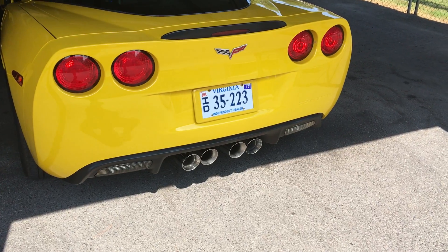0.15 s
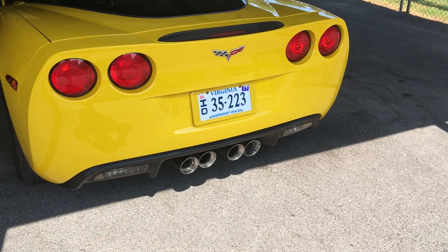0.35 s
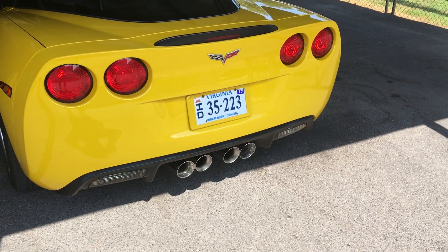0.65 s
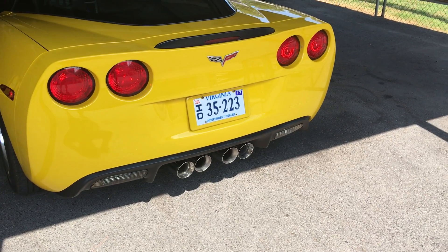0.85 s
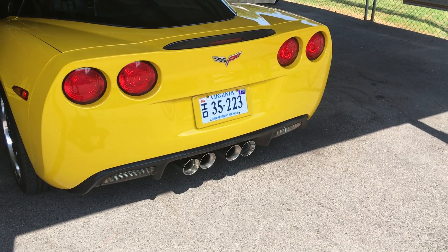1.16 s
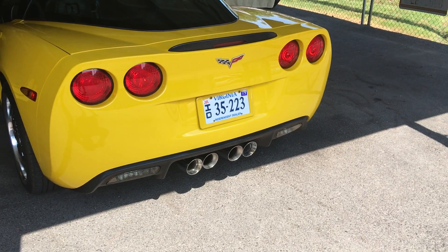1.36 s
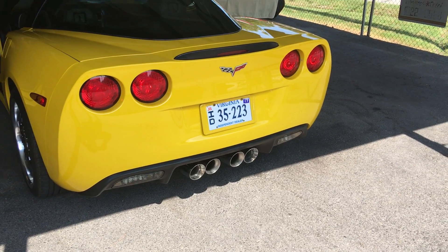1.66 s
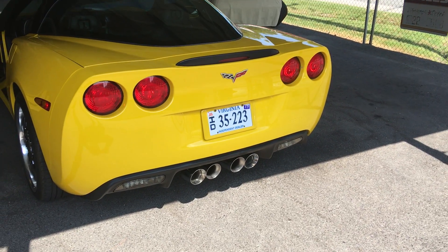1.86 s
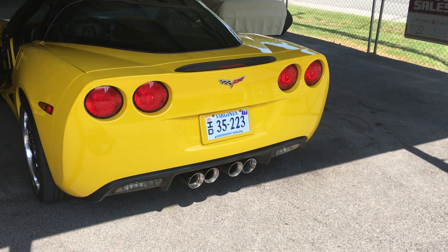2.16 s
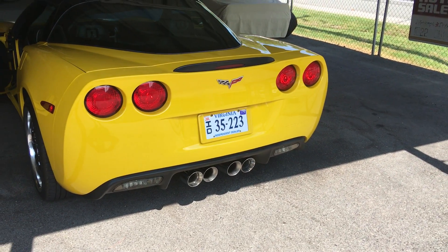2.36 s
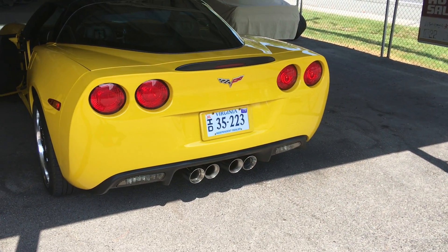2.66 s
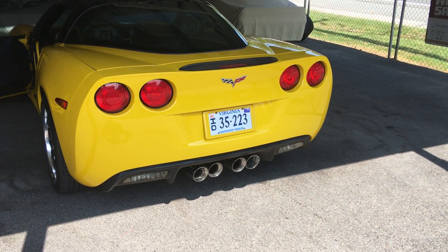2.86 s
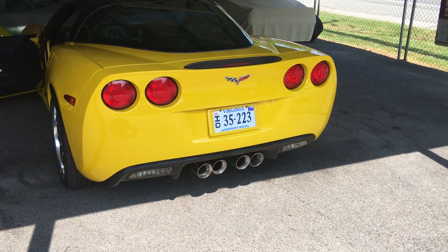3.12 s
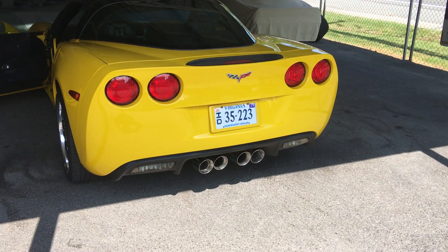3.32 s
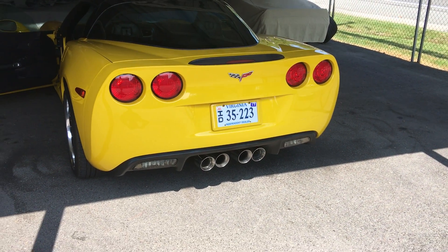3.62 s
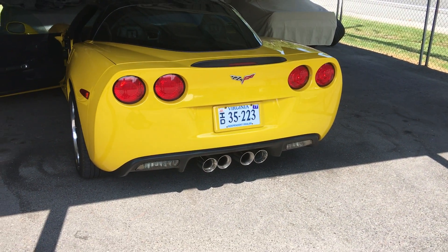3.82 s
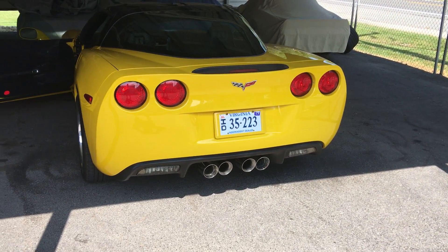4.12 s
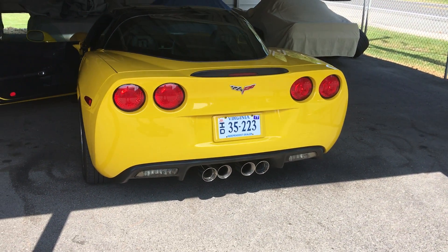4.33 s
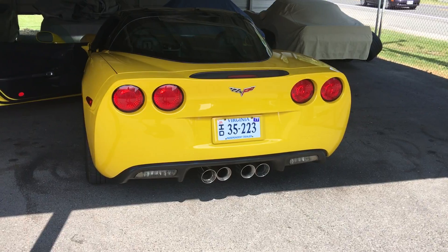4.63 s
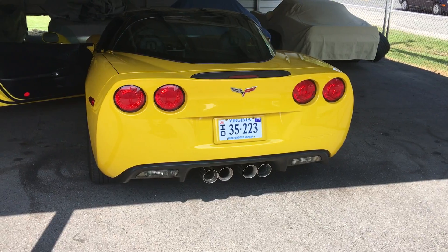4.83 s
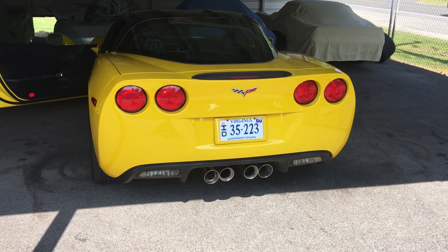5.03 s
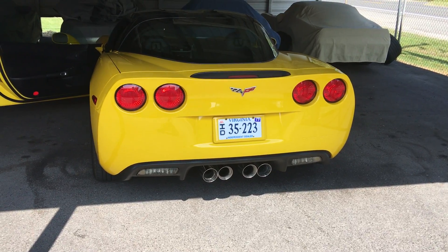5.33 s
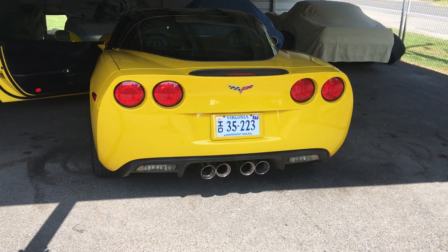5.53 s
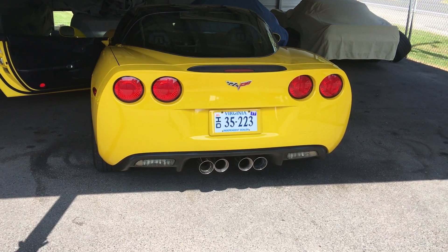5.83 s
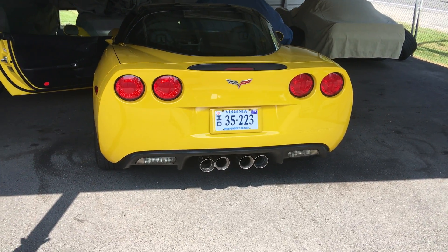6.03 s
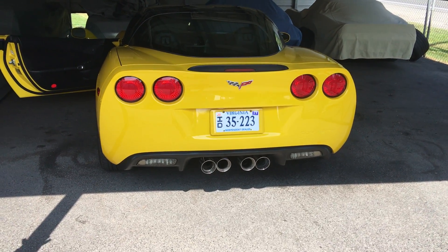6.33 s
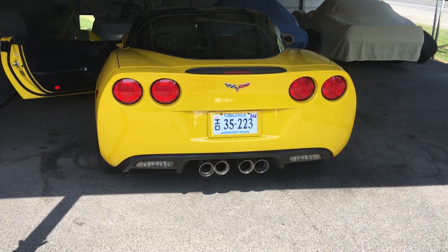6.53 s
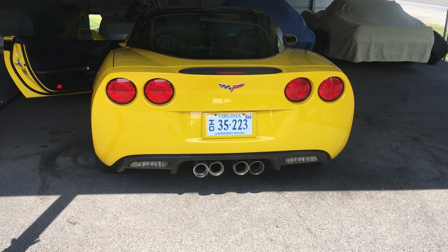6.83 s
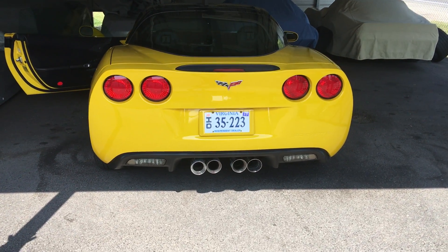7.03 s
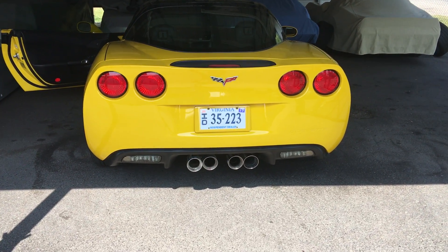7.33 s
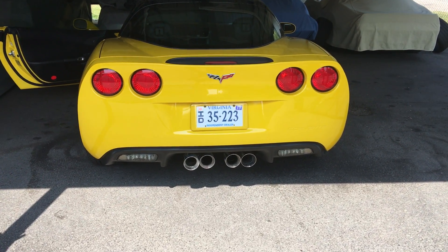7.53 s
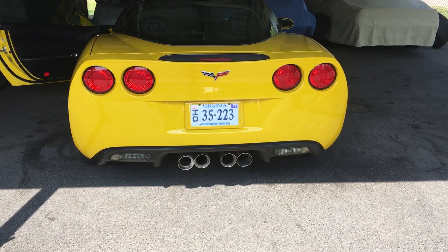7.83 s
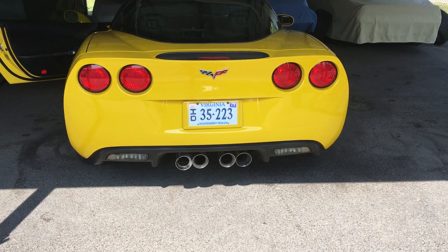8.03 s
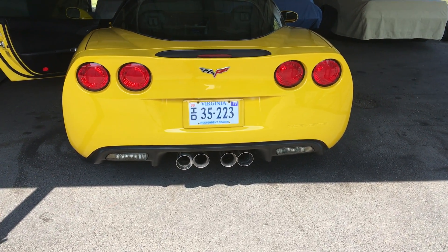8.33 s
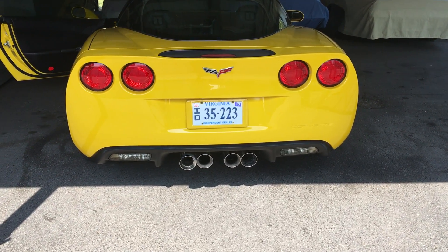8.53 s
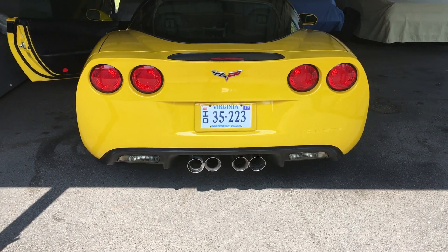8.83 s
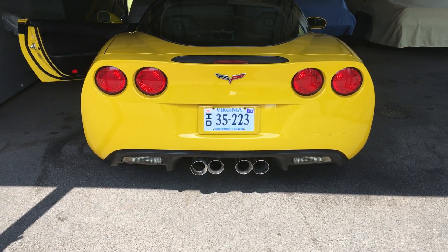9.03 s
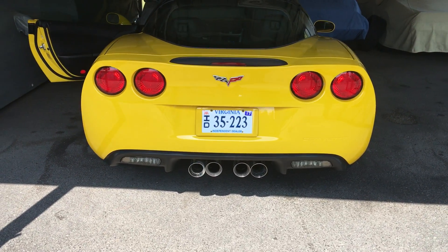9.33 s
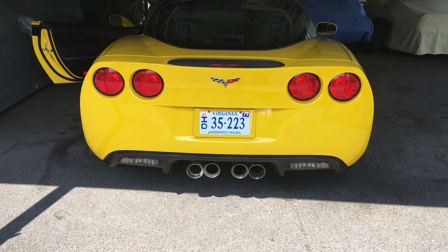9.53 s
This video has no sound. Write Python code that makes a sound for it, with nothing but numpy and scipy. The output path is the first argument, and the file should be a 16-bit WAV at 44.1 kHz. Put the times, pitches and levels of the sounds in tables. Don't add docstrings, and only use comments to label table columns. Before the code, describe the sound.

A big V8 idles roughly from start to finish, already running. Heavy low thumps roll in an uneven lope of strong firings and near misses, with rasp, short metallic ringing and hissing gas from the exhaust tips. The handheld microphone, a few steps away, moves from beside the car to directly behind, so the bark grows louder and crisper. Short open carport reflections and faint passing cars surround it.

```python
import sys
import numpy as np
from scipy import signal
from scipy.fft import rfft, irfft
from scipy.io import wavfile
from scipy.ndimage import uniform_filter1d

SR = 44100
rng = np.random.default_rng(int(sys.argv[2]) if len(sys.argv) > 2 else 0)


def log_audio(samples):
    frames = np.atleast_2d(samples).T
    limited = np.clip(frames, -1, 1)
    pcm = np.round(limited * 32767).astype(np.int16)
    wavfile.write(sys.argv[1], SR, pcm)


def linear_from_db(decibels):
    return 10 ** (np.asarray(decibels, float) / 20)


N = 426447

FIRE_HZ = 57.9
# (time [s], share of the way round [0-1])
WALK = [
    (0, 0),
    (1.3, 0.19),
    (3, 0.35),
    (5, 0.69),
    (7, 0.81),
    (8, 0.78),
    (9.67, 1),
]


def evened(x):
    return x / np.sqrt(np.mean(x ** 2) + 1e-20)


def curve(rows, t):
    return np.interp(t, *np.transpose(rows))


def coloured(x, points):
    f, level_db = np.transpose(points)
    hz = np.fft.rfftfreq(len(x), 1 / SR)
    gain = linear_from_db(np.interp(np.log(hz + 1), np.log(f), level_db))
    return irfft(rfft(x) * gain, len(x))


def train(s, size):
    sample = np.clip(np.round(s * SR).astype(int), 0, N - 1)
    return np.bincount(sample, size * (s < N / SR), N)


def puffs(s, size, rise_ms, fall_ms):
    ms = np.arange(4096) * 1000 / SR
    puff = (1 - np.exp(-ms / rise_ms)) ** 2 * np.exp(-ms / fall_ms)
    return signal.oaconvolve(train(s, size), puff)[:N]


def yard():
    # (closest time [s], half-length [s], level [dB])
    passing = [
        (0.09, 0.19, 1),
        (2.69, 1, 7.5),
        (5.6, 1.0, 7),
        (9.9, 0.49, 11.5),
    ]
    # (frequency [Hz], density [dB per Hz])
    yard_colour = [(260, -20), (450, -10.5), (530, -6.5), (905, 1), (1350, -10), (2280, -18.5), (2680, -22),
                   (5010, -28), (9350, -34), (15700, -73)]
    t = np.arange(N) / SR
    swell_db = sum(db / (1 + ((t - s) / half_s) ** 2) for s, half_s, db in passing)
    noise = evened(coloured(rng.standard_normal(N), yard_colour))
    return linear_from_db(-45 + swell_db - swell_db.mean()) * noise


def carport(x):
    at = np.arange(300, 12000, 20)
    sign = rng.choice([-1., 1.], len(at))
    arrival_s = (at + rng.integers(0, 20, len(at))) / SR
    taps = train(arrival_s, sign * linear_from_db(-60 * at / SR / .25))[:12100]
    return signal.oaconvolve(x, taps / np.linalg.norm(taps))[:N]


def burns(s):
    # (swap time [s], time it takes [s])
    swaps = [
        (6.4, 1.0),
        (3.4, .7),
        (10.3, 2.4),
        (2.1, .3),
        (1.93, .1),
        (7.6, .1),
        (1.72, .2),
        (-2., .3),
    ]
    first_turn = [1, 1, 1, 1, 1, 0, 1, 1]
    overlap = 0.18
    k = np.arange(len(s))
    swap_s, takes_s = np.array(swaps)[k % 8].T
    first = k // 8 % 2 == np.take(first_turn, k % 8)
    toward = np.where(first, -1, 1) * (s - swap_s) / takes_s
    return np.clip(.5 + overlap + toward, 0, 1), first


def firings():
    # (time [s], crank lead [firings])
    crank = [(0.0, -0.06), (0.14, 0.38), (0.83, 0.63), (1.11, 0.6), (1.52, 0.83), (1.66, 1.11),
             (2.07, 0.94), (2.21, 0.73), (2.76, 1.72), (3.87, 1.4), (4.14, 1.82), (4.7, 2.03), (5.11, 1.81),
             (6.08, 2.63), (6.35, 2.22), (7.74, 2.27), (8.84, 1.48), (9.67, 1.68)]
    flywheel = .033

    def levelled(v):
        trend = uniform_filter1d(v, size=16, mode="nearest")
        return v - uniform_filter1d(trend, size=16, mode="nearest")

    t = np.arange(0, N, 64) / SR
    turns = t * FIRE_HZ + curve(crank, t)
    k = np.arange(int(turns[-1]))
    push = levelled(burns(np.interp(k, turns, t))[0])
    speed = levelled(np.cumsum(push))
    lead = flywheel * levelled(np.cumsum(speed))
    return np.interp(k - lead, turns, t)


def pattern(s):
    # (bark before swap [dB], bark after [dB], crack [dB],
    #             upper pipe modes on a burn [dB], the same on a miss [dB])
    cylinders = [(-2.5, -0.5, 3, 0.5, 0), (-2, -0.5, 1.5, 0.5, 3), (0, -1, 1, 2, 1),
                 (-2, -0.5, 4, -1, -4.5), (-1, -0.5, 3, -3, 5), (-2, -1, 5, -2.5, -3),
                 (-0.5, 0, 2.5, 3, -6), (-2, -0.5, 4.5, 1.5, -5)]
    miss_db, spill_db = -13.5, -13
    plain_crack_db, missed_crack_db = -9, -49.5
    after_miss_db, crack_round_db = 2, 9
    (burn, first), share = burns(s), curve(WALK, s)
    before_db, after_db, edge_db, burnt_db, missed_db = np.array(cylinders)[np.arange(len(s)) % 8].T
    own_db = miss_db + burn * (np.where(first, before_db, after_db) - miss_db)
    level_db = np.maximum(own_db, np.roll(own_db, 1) + spill_db)
    rested = 1 - np.roll(burn, 1)
    burnt_crack_db = edge_db + rested * (after_miss_db + crack_round_db * share)
    crack_db = plain_crack_db + burn * burnt_crack_db + (1 - burn) * missed_crack_db * (.5 + rested / 2)
    upper_db = missed_db + burn * (burnt_db - missed_db) + 2.5 * share
    return level_db, crack_db, upper_db, burn * rested * share


def hiss(s, fired_db, edge_db):
    # (frequency [Hz], density [dB per Hz])
    jet = [(1410, -24), (2400, -4.5), (2560, -7), (2830, -17), (3560, -8.5), (4200, -11.5), (4990, -11),
           (5930, -10), (9510, -11), (10400, -10), (11100, -12), (14100, -15.5), (15700, -17.5)]
    crack_db = np.minimum(2.2 * edge_db, 8) + 1.7 * rng.standard_normal(len(s))
    crack = puffs(s + .0062, linear_from_db(crack_db), .6, 2.5)
    flow = puffs(s + .005, linear_from_db(.7 * fired_db), 4.0, 17.)
    gas = (0.69 * evened(crack) + evened(flow)) * rng.standard_normal(N)
    return linear_from_db(-54.5) * evened(coloured(gas, jet))


def bark(s, size):
    # (frequency [Hz], density [dB per Hz])
    beside = [(260, -36), (450, 1.5), (480, -40), (549, -55), (669, 1), (766, 0), (912, 7.5), (1450, -10),
              (1670, -22), (1750, -9.5), (2020, -10), (2360, -16), (2540, -32), (3000, -48), (3900, -56.5),
              (6600, -120)]
    midway = [(260, -54), (450, -4.5), (507, -15), (589, -5), (685, -18.5), (742, 0.5), (949, -4),
              (1090, -5.5), (1360, -11.5), (1480, -7.5), (1630, -2.5), (1820, -21.5), (2400, -32),
              (3000, -30), (3900, -54), (6600, -120)]
    facing = [(260, -29), (450, -2), (523, -50), (571, -16), (613, -7.5), (736, -4.5), (797, -1.5),
              (927, 4.5), (1080, 6), (1390, -10), (1670, -19.5), (1970, -22), (2180, -39), (3000, -71),
              (3900, -81), (6600, -120)]
    envelope = puffs(s + .0008, size, 2.2, 5.5) + .25 * puffs(s, size, 3.0, 20.)
    rasp = envelope * rng.standard_normal(N)
    share = np.clip(curve(WALK, np.arange(N) / SR), 0, 1)
    blend = np.zeros(N)
    for at, colour, db in zip((0, .5, 1), (beside, midway, facing), (2.5, 1.5, .3)):
        weight = np.clip(1 - 2 * abs(share - at), 0, 1)
        blend += weight * linear_from_db(db) * coloured(rasp, colour)
    return linear_from_db(-38.) * evened(blend)


def tips(s, size, rested):
    # (beside [Hz], facing [Hz], beside [dB], facing [dB], delay [ms])
    tip_rings = [(925, 993, -32, -25, 0.72), (1524, 1633, -47, -39.5, 3.016), (2064, 2295, -34, -47, 2.545)]
    rested_gain = [2, 2.5, -0.5]
    pitch_spread, spread_db, rise_ms, fall_ms = .06, 1.5, 1.7, 3.6
    n, share = np.arange(700), np.clip(curve(WALK, s), 0, 1)
    ms = n * 1000 / SR
    shape = (1 - np.exp(-ms / rise_ms)) ** 2 * np.exp(-ms / fall_ms)
    luck, out = rng.standard_normal((len(s), len(tip_rings), 3)), np.zeros(N)
    for (hz0, hz1, db0, db1, delay_ms), rested_db, (a, b, c) in zip(tip_rings, rested_gain, luck.transpose(1, 2, 0)):
        hz = (hz0 + share * (hz1 - hz0)) * (1 + pitch_spread * a)
        gain = size * linear_from_db(db0 + share * (db1 - db0) + spread_db * b + rested_db * rested + 11.0)
        wave = np.sin(2 * np.pi * hz[:, None] * n / SR + 3 * c[:, None])
        at = s[:, None] + delay_ms / 1000 + n / SR
        out += train(at.ravel(), (gain[:, None] * shape * wave).ravel())
    return out


def thump(s, fired_db, upper_db):
    # (frequency [Hz], width [Hz], level [dB], crest after arrival [ms], share of a miss's drop [0-1])
    modes = [(64.4, 69, -1, 12.7, 0.87), (76.6, 10.8, 6, 10.83, 0.5), (106.2, 20.6, 2.5, 13.31, 0.65),
             (120, 21, -10.5, 12.8, 0.89), (185.3, 10.7, -10.5, 12.16, 0.31), (242.9, 64, -7, 10.02, 0.35),
             (311.3, 20.2, -13, 9.1, 0.72), (367, 134, -18, 8.61, 0.38), (32.4, 40, -18.5, 5.8, 0.2)]
    fore = [0, 0, 0.65, 0.72, 0, 0, 0.01, 0.24, 0.4]
    header_ms = [5.24, 5.48, 4.46, 5.3, 6.3, 5.0, 7.2, 4.6]
    shove = [0, -4, -11, 2, 2, 1, -3, 1]
    spread_db, mode_spread_db, jitter_ms = 1.2, 2.2, .6
    churn, rise_ms, upper_hz = .18, 2.5, 200
    fore_ms, echo, echo_ms = 17.3, .35, 17.6

    cylinder = np.arange(len(s)) % 8
    shove_db = fired_db + np.take(shove, cylinder) + spread_db * rng.standard_normal(len(s))
    at = s + (np.take(header_ms, cylinder) + jitter_ms * rng.standard_normal(len(s))) / 1000
    vary = rng.standard_normal((len(s), len(modes)))
    flow = evened(puffs(at, linear_from_db(0.13 * shove_db), 0.66, 48.0))
    gas = churn * flow * rng.standard_normal(N) * np.sqrt(FIRE_HZ / SR)
    t = np.arange(6000) / SR
    swell, out = (1 - np.exp(-t * 1000 / rise_ms)) ** 2, np.zeros(N)
    for m, (hz, width_hz, db, crest_ms, share) in enumerate(modes):
        blow = linear_from_db(share * shove_db + mode_spread_db * vary[:, m] + (hz > upper_hz) * upper_db)
        drive = train(at, blow) + fore[m] * train(abs(at - fore_ms / 1000), blow)
        drive += echo * (1 - fore[m]) * train(at + echo_ms / 1000, blow)
        drive += 2 * (1 - share) * gas
        decay = swell * np.exp(-np.pi * width_hz * t) * width_hz
        ring = decay * np.cos(2 * np.pi * hz * (t - crest_ms / 1000))
        out += linear_from_db(db) * signal.oaconvolve(drive, ring)[:N]
    steep = signal.butter(2, [30, 430], "bandpass", fs=SR, output="sos")
    return linear_from_db(-13.5) * evened(signal.sosfiltfilt(steep, out))


def lead_in(x, s):
    n, lope = np.arange(2000), round((s[16] - s[0]) * SR)
    fade = np.sin(np.pi / 2 * n / len(n))
    start = fade * x[n] + np.sqrt(1 - fade ** 2) * x[n + lope]
    return np.concatenate([start, x[len(n):]])


def scene():
    s = firings()
    level_db, crack_db, upper_db, rested = pattern(s)
    round_db = 6.5
    bark_db = round_db * curve(WALK, s) + 2.84 * level_db + 1.44 * rng.standard_normal(len(s))
    fired_db = np.clip(2.2 * (level_db + 5.5), -19, 0)
    exhaust = thump(s, fired_db, upper_db) + tips(s, linear_from_db(bark_db - 5.5), rested)
    exhaust += bark(s, linear_from_db(bark_db)) + hiss(s, fired_db, crack_db)
    under_roof = exhaust + linear_from_db(-10.5) * carport(exhaust)
    return (lead_in(under_roof, s) + yard())[None]


def band_limit(x):
    return signal.sosfilt(signal.butter(12, 15890, fs=SR, output="sos"), x)


def record(dry):
    # (frequency [Hz], level [dB])
    capsule = [(30, -4), (4500, 2), (4980, -3.5), (5500, 0.5), (9800, -0.5), (10400, -7), (11000, -1.5),
               (15800, -3.5), (16100, -35)]
    heard = coloured(dry[0], capsule)[None]
    limited = 1.078 * np.tanh(heard / 0.99)
    return band_limit(limited)


dry = scene()
out = record(dry)
log_audio(out)
```